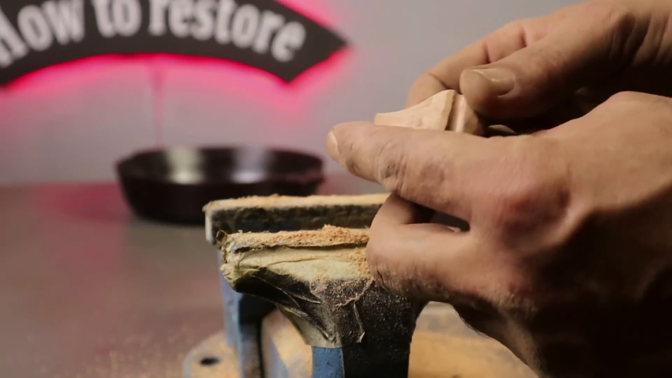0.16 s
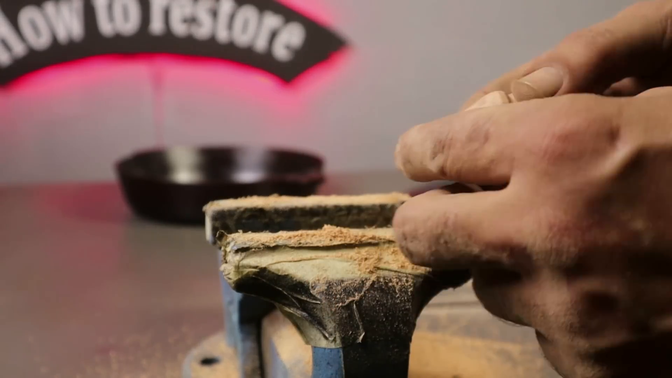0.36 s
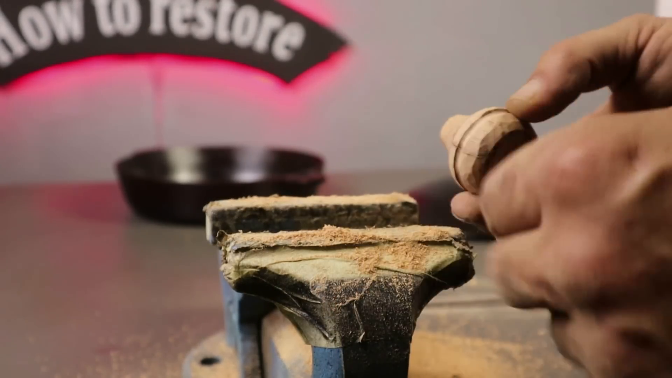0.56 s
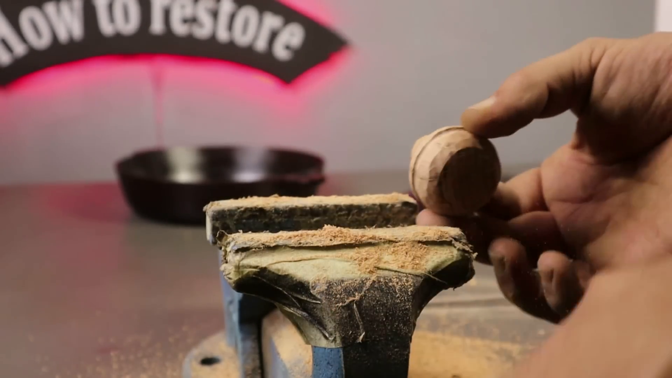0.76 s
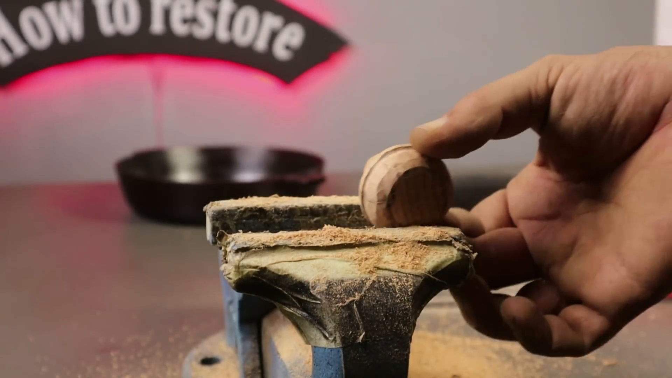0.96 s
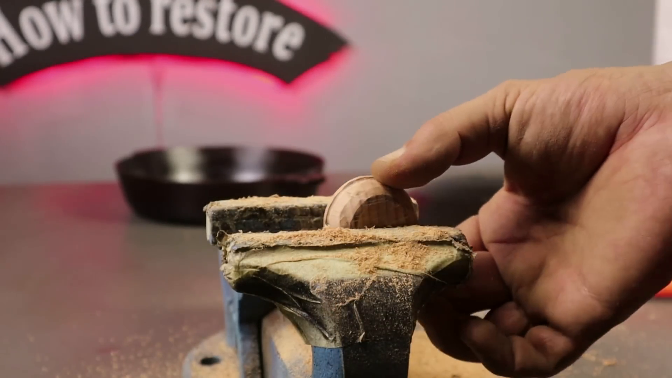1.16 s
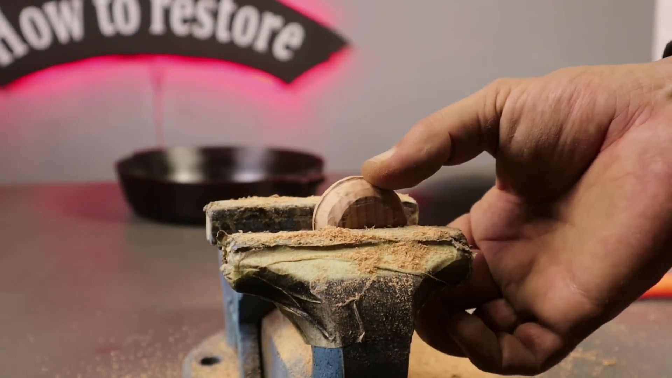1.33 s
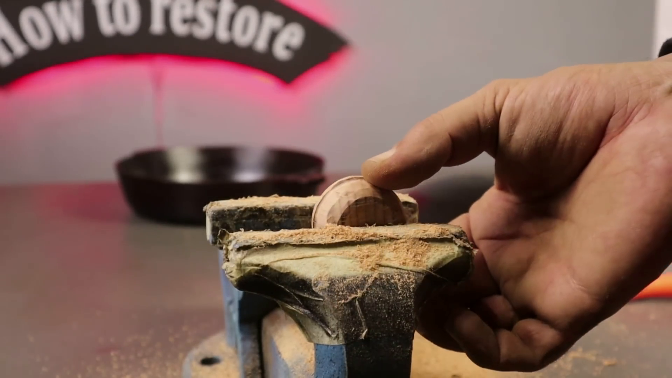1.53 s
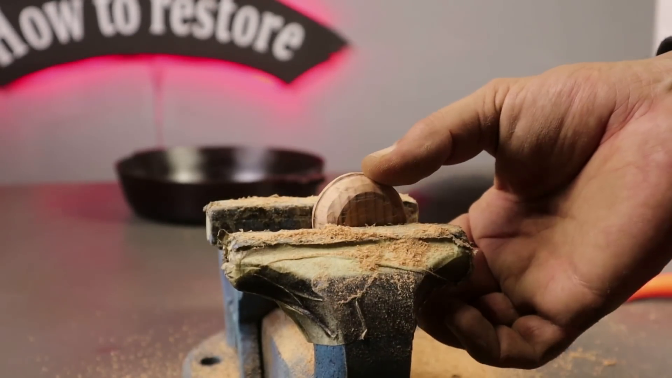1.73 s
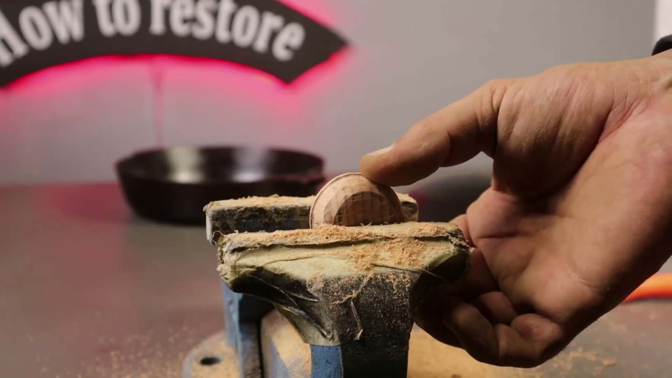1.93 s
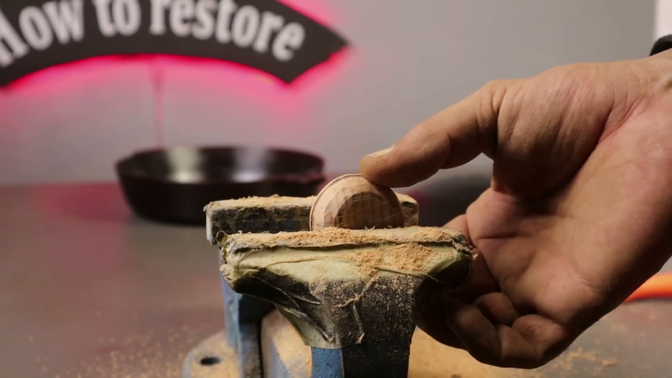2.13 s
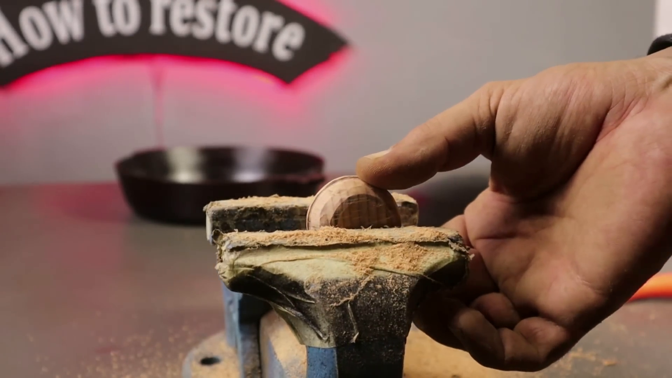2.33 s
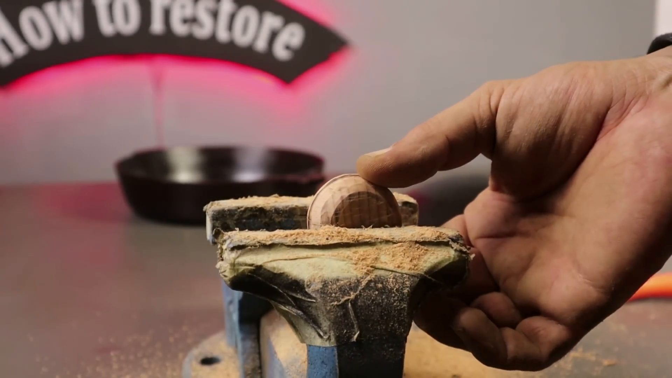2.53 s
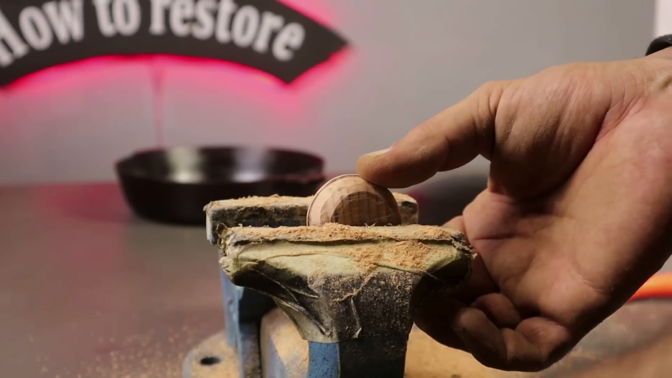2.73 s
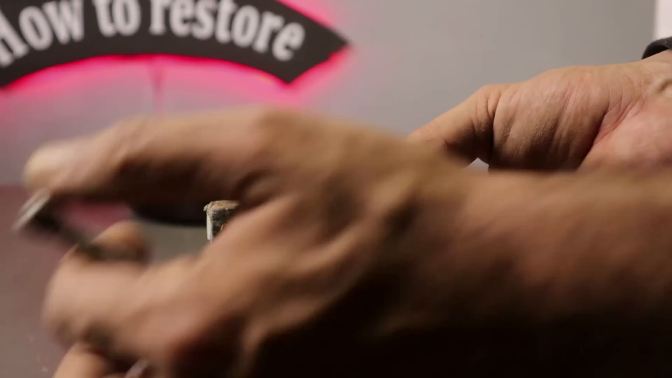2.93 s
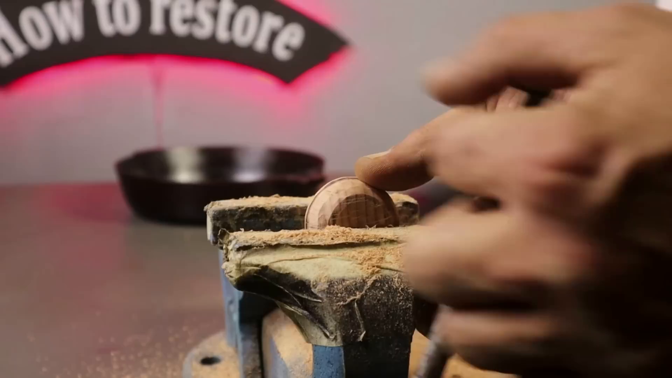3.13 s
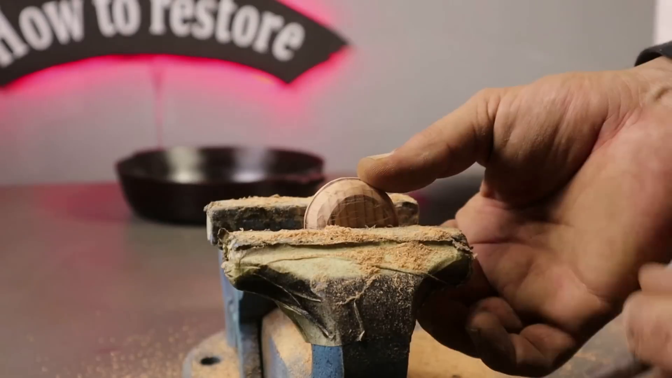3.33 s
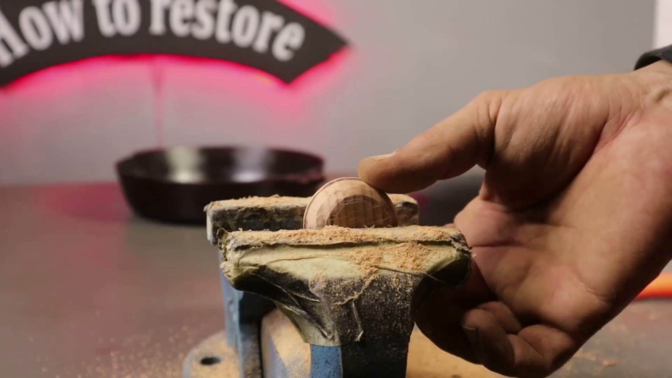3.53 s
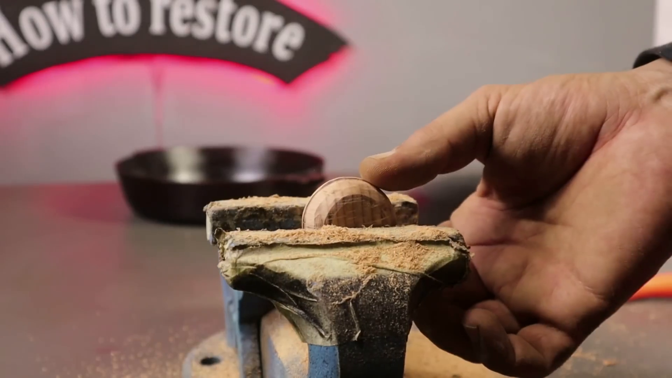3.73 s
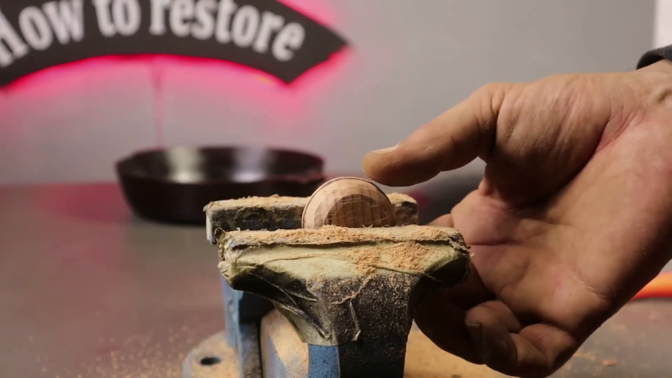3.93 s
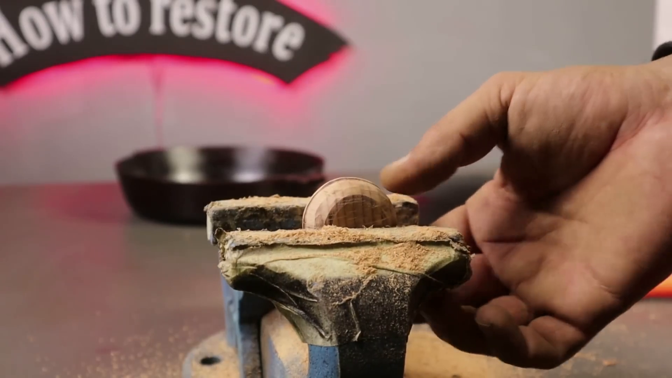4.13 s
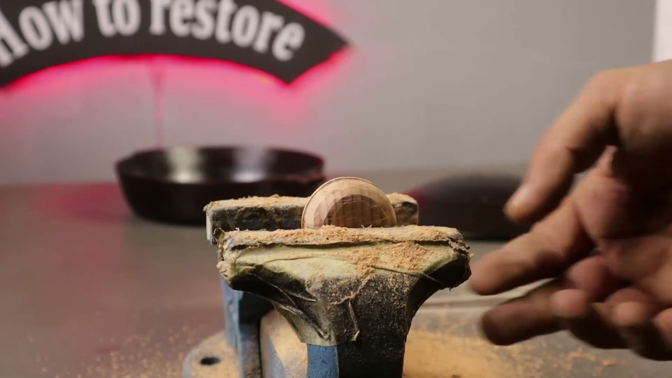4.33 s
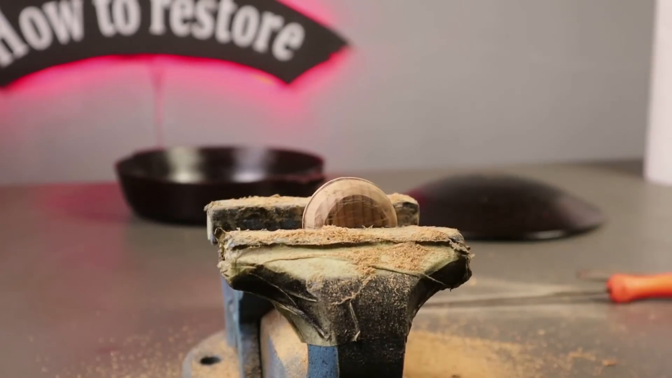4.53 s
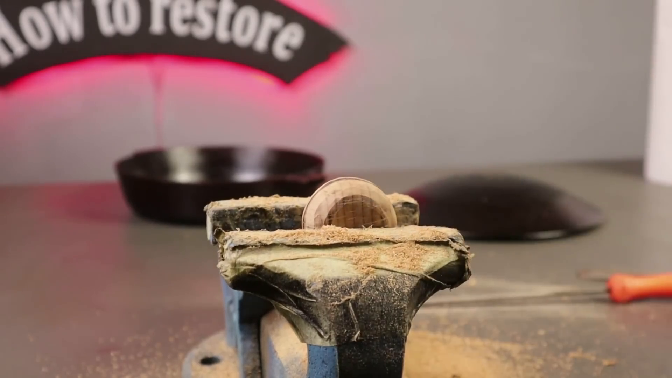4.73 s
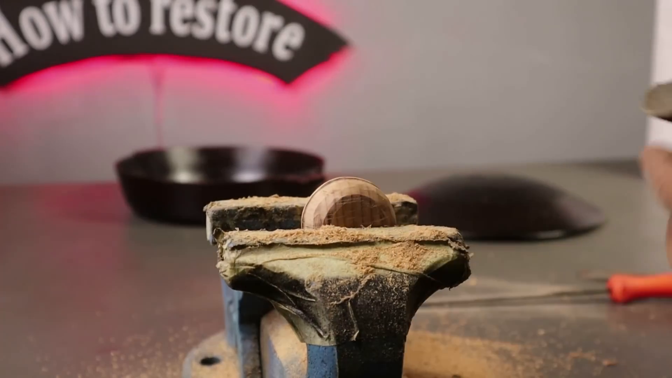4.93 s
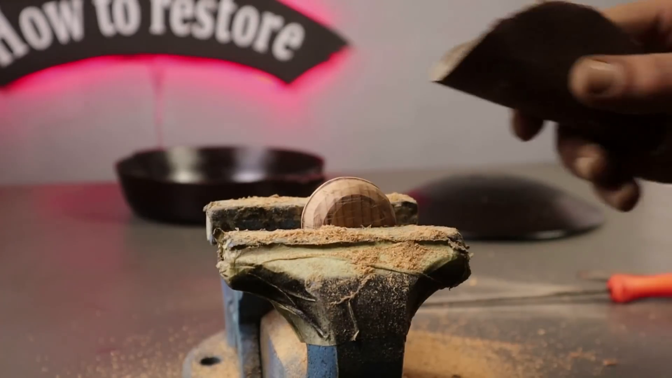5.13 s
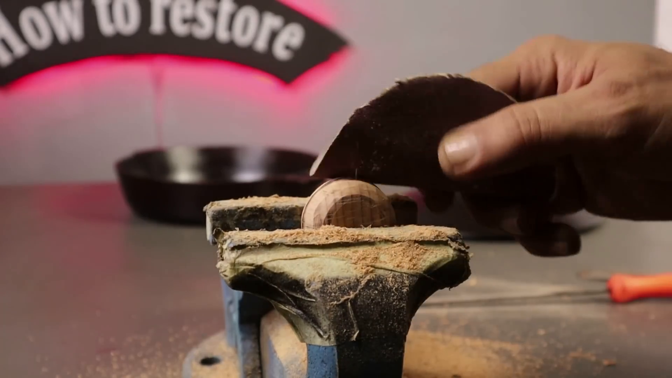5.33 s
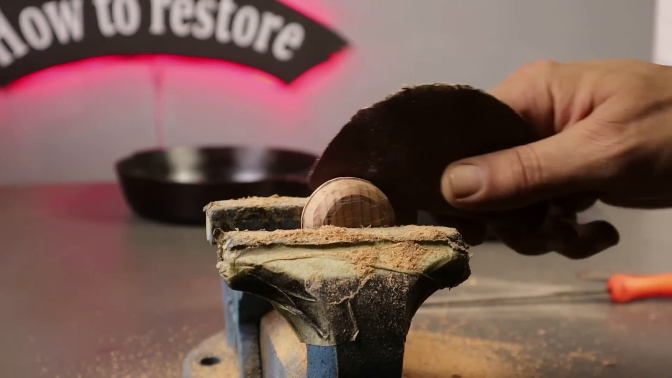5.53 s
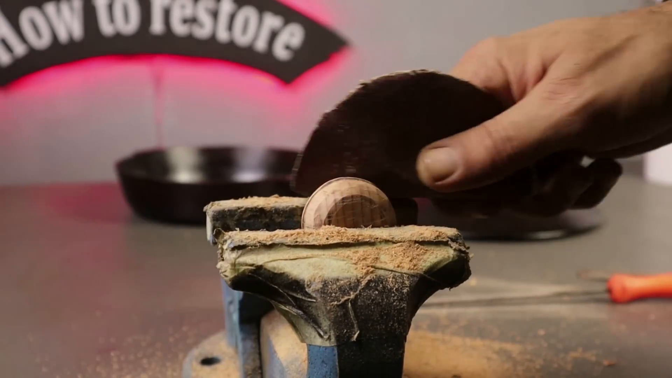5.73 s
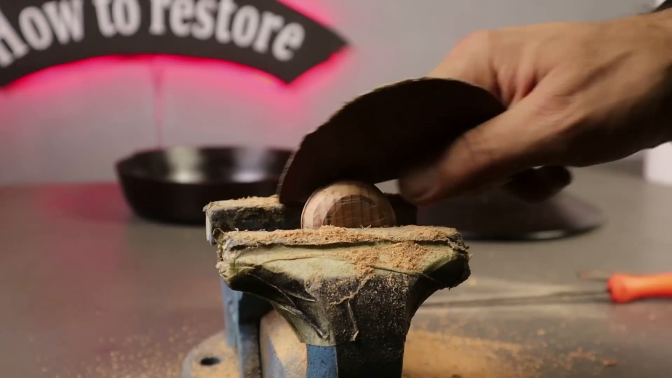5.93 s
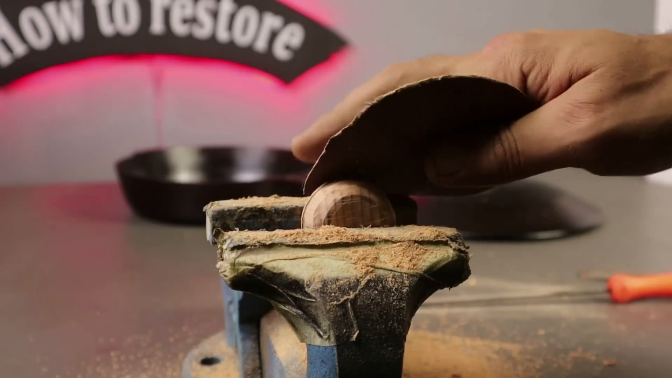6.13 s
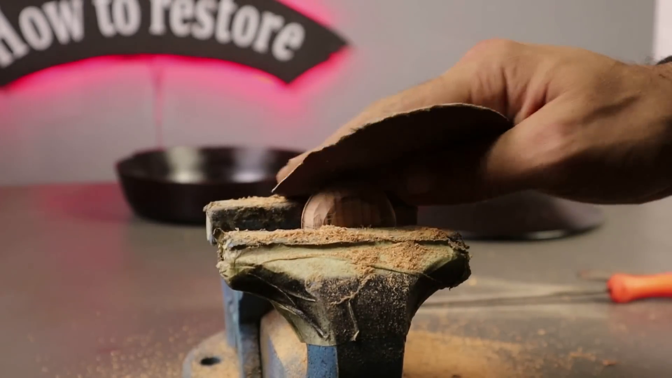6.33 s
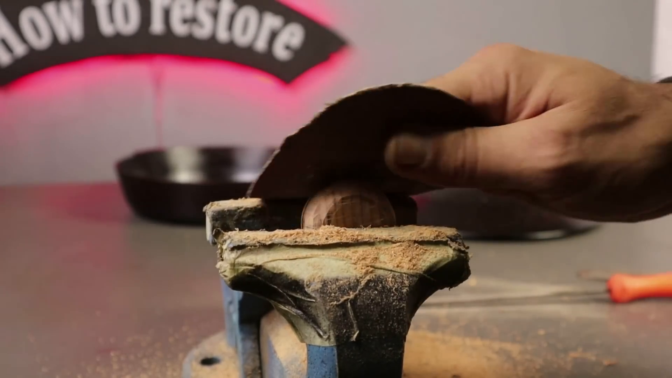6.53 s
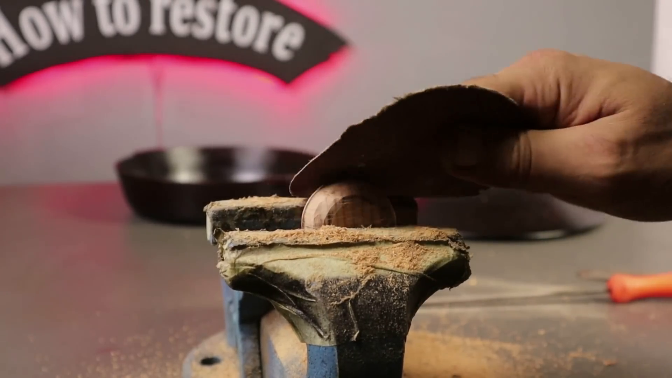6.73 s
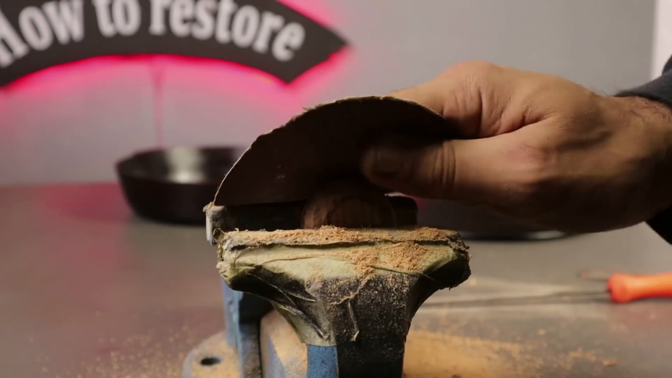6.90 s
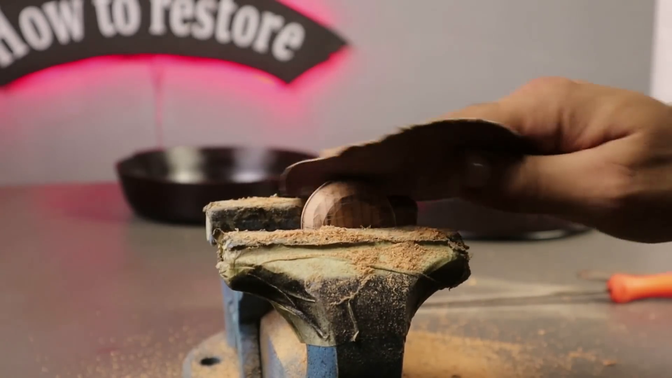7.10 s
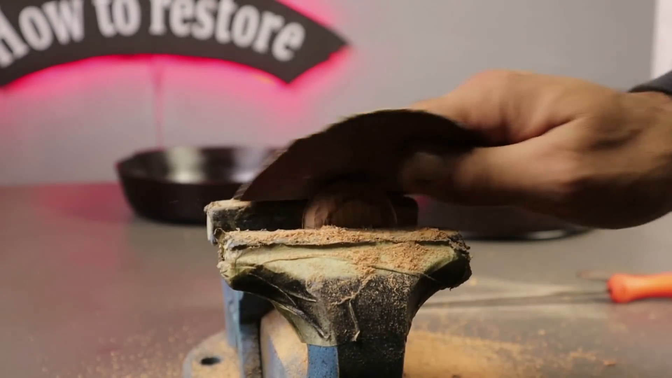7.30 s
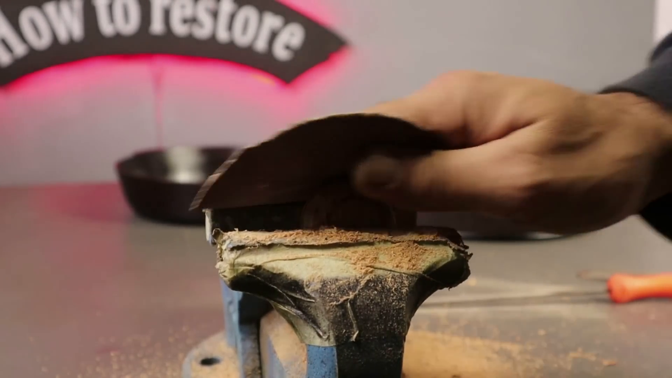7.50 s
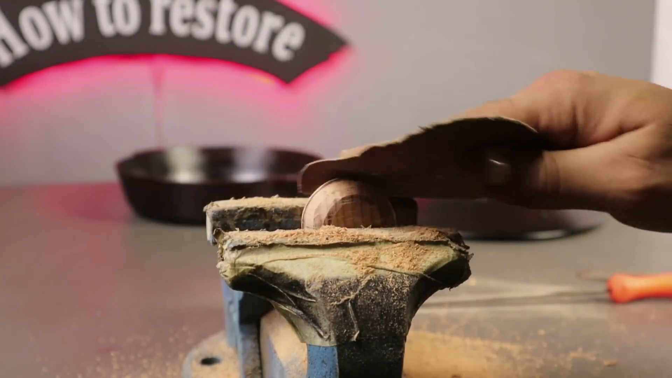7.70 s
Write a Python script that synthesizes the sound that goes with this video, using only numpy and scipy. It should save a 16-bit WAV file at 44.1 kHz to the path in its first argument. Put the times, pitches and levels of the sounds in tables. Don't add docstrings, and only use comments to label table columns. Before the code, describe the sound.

A close, central microphone hears a small workshop with low, uneven fan rumble and faint wide hiss throughout. A distant motor hum fades out by about 1 s. Around 0.6-1.0 s fingers brush wood softly, with tiny, very high squeaks. Faint vise taps begin at 1.2 s, with a light rattling cluster at 1.4-1.7 s. A loud metallic double knock lands at 2.07 s with a quick clink, then duller woody clunks at 2.65 and 2.91 s, each with a short bench thud and room echo. From 3 to 5.3 s it is mostly quiet, with slight rustles and weak thuds near 4 s. Stiff paper ticks on the wood at 5.4 s. Sanding follows: dry, gritty back-and-forth rasps roughly every 0.16 s, fuller around 5.6-6 s, dipping near 6.4 s, then harsher, brighter and louder from 6.6 s until the end near 7.9 s.

```python
import sys
import numpy as np
from scipy import signal
from scipy.fft import rfft, irfft, next_fast_len
from scipy.io import wavfile
from scipy.ndimage import uniform_filter1d, map_coordinates

SR = 44100
rng = np.random.default_rng(int(sys.argv[2]) if len(sys.argv) > 2 else 0)


def gain_from_decibels(decibels):
    exponent = np.asarray(decibels, float) / 20
    return 10 ** exponent


def master(y):
    cut = np.clip(np.atleast_2d(y).T, -1, 1)
    pcm = np.round(cut * 32767)
    wavfile.write(sys.argv[1], SR, pcm.astype(np.int16))


N = 346626
T = np.arange(N) / SR

# f/Hz, level/dB per Hz
SLACK_PAPER = [(760, -4), (1300, 2), (2130, 7.5), (3010, -14), (3720, -11), (4350, -12.5), (7590, -9),
               (9560, -11.5), (15200, -17.5), (16000, -3)]


def unit(x):
    return x / np.sqrt(np.mean(x ** 2) + 1e-20)


def along(points, hz):
    f, v = np.transpose(points)
    return np.interp(np.log(hz + 1), np.log(f + 1), v)


def wobble(rate):
    knots = rng.standard_normal(int(N * rate / SR) + 4)
    return map_coordinates(knots, [T * rate])


def filtered(x, response):
    m = next_fast_len(x.shape[-1] + 8192)
    spectrum = rfft(x, m) * response(np.fft.rfftfreq(m, 1 / SR))
    return irfft(spectrum, m)[..., :x.shape[-1]]


def resonances(modes, f):
    total = 0
    for k, (c, w, db) in enumerate(modes):
        sign = (-1) ** k
        total = total + sign * gain_from_decibels(db) * 1j * f * w / (c * c - f * f + 1j * f * w)
    return total


def patchy(patchy_db):
    z = signal.stft(rng.standard_normal(N), nperseg=512)[2]
    field = uniform_filter1d(rng.standard_normal(z.shape), size=6, axis=0)
    field = uniform_filter1d(field, size=6, axis=1)
    return signal.istft(z * gain_from_decibels(patchy_db * unit(field)), nperseg=512)[1][:N]


def widened(mid, side_db):
    scramble = rng.standard_normal(900)
    side = signal.fftconvolve(mid, scramble / np.linalg.norm(scramble))[:N]
    side = filtered(side, lambda hz: gain_from_decibels(along(side_db, hz)))
    return np.array([mid + side, mid - side])


def shop(x, wet_db):
    # f/Hz, time to fall 60 dB/s
    room_decay = [(150, 0.29), (500, 0.48), (1200, 0.44), (3000, 0.22), (8000, 0.29)]
    hz, t, z = signal.stft(rng.standard_normal(SR // 2), SR, nperseg=256)
    fade = gain_from_decibels(-60 * t / along(room_decay, hz)[:, None])
    tail = signal.istft(z * fade, SR, nperseg=256)[1]
    tail = np.pad(tail, (180, 0))
    return x + gain_from_decibels(wet_db) * signal.fftconvolve(x, tail / np.linalg.norm(tail))[:len(x)]


def air():
    # t/s, level/dB
    fan_effort = [(0, -58), (.65, -54.5), (1.2, -57), (2.3, -54.5), (3.3, -56.5), (3.9, -56), (5.3, -59),
                  (7.1, -58), (7.86, -53)]
    # t/s, level/dB
    motor_level = [(0, -52), (.5, -56.5), (.75, -54), (.95, -66), (1.1, -102)]
    # f/Hz, level/dB per Hz
    rumble_tone = [(12, -40), (27, -32), (45, -8.5), (62, -5.5), (141, -7), (295, -10.5), (338, -18),
                   (492, -24.5), (605, -28), (1200, -33), (1560, -31), (2640, -120)]
    # f/Hz, level/dB per Hz
    hiss_tone = [(350, 1.5), (600, -0.5), (748, -4), (1700, -6.5), (2340, -8), (15100, -11.5),
                 (16000, -15.5)]
    # f/Hz, side minus mid level/dB
    air_width = [(60, -28), (110, -37), (200, -23), (380, -13), (700, -10.5), (1290, -5.5), (2380, -0.5),
                 (4400, -0.5), (8120, 0), (15000, -1)]

    rumble_db = np.interp(T, *np.transpose(fan_effort)) + 1.7 * wobble(3.0) + 0.31
    rumble = gain_from_decibels(rumble_db) * unit(filtered(patchy(patchy_db=2.0), lambda hz: gain_from_decibels(along(rumble_tone, hz))))

    motor_hz = 140 + 5.5 * wobble(16)
    motor_db = np.interp(T, *np.transpose(motor_level)) + 2.5 * wobble(8)
    motor = gain_from_decibels(motor_db) * np.sin(2 * np.pi * np.cumsum(motor_hz) / SR)

    hiss = gain_from_decibels(-60) * unit(filtered(rng.standard_normal(N), lambda hz: gain_from_decibels(along(hiss_tone, hz))))
    return widened(rumble + motor + hiss, air_width)


def brushing():
    # start t/s, length/s, level/dB, centre f/Hz,
    # width/octaves
    brushes = [(0.625, 0.1, -61, 8500, 0.27), (0.73, 0.062, -57.5, 8000, 1.1),
               (0.831, 0.13, -60, 3000, 3.6), (3.321, 0.15, -58, 9900, 1.2), (3.898, 0.065, -63, 11000, .6),
               (4.19, 0.085, -62.5, 1020, 0.02), (4.892, 0.087, -56, 3720, 1.1),
               (4.887, 0.12, -60, 1640, 0.49), (5.102, 0.053, -52.5, 5270, 2),
               (5.105, 0.075, -60, 2170, 0.16), (5.19, 0.021, -60, 2020, 0.23),
               (5.209, 0.067, -58, 1810, 0.17), (5.348, 0.05, -55.5, 1920, 0.49)]
    out = np.zeros(N)
    for s, length, db, hz, octaves in brushes:
        swell = np.sin(np.pi * np.linspace(0, 1, round(length * SR))) ** 1.2
        band = lambda f: np.exp(-.5 * (np.log2((f + 1) / hz) / octaves) ** 2)
        rub = unit(filtered(rng.standard_normal(SR // 2), band))[:len(swell)]
        out[round(s * SR):][:len(swell)] += gain_from_decibels(db) * swell * rub
    return out


def squeaks():
    # start t/s, length/s, level/dB, top f/Hz, fastest at t/s
    slips = [
        (0.95, 0.049, -55, 14640, .887),
        (0.84, 0.094, -63, 10400, .89),
        (0.807, 0.049, -64, 10900, .885),
        (.885, .035, -62, 11000, .89),
        (0.83, 0.032, -70, 12000, .89),
        (.77, 0.057, -75, 10400, 0.6),
        (.785, 0.046, -75, 8400, 0.52),
        (.865, .04, -75, 12000, .88),
        (.86, .04, -76, 4500, .88),
    ]
    bow = 58
    out = np.zeros(N)
    for s, length, db, hz, fastest in slips:
        swell = np.sin(np.pi * np.clip((T - s) / length, 0, 1)) ** .6
        speed = np.clip(1 - bow * (T - fastest) ** 2, .5, 1)
        pitch = hz * (speed + .006 * wobble(250))
        tone = np.sin(2 * np.pi * np.cumsum(pitch) / SR)
        out += gain_from_decibels(db + 3 + 4 * wobble(120)) * swell * tone
    return out


def ringing(modes, t, spot_hz, reach):
    luck = rng.normal([0, 1], [2.5, .006], (len(modes), 2))
    total = 0
    for (hz, db, t60), (luck_db, detune) in zip(modes, luck):
        far_db = 10.0 * (np.log2(hz / spot_hz) / reach) ** 2
        level_db = db + luck_db - far_db - 60 * t / t60
        total = total + gain_from_decibels(level_db) * np.sin(2 * np.pi * hz * detune * t)
    return total


def rattle(t, hz, width_hz, t60):
    noise = filtered(rng.standard_normal(len(t)), lambda f: resonances([(hz, width_hz, 0)], f) ** 2)
    return unit(noise) * gain_from_decibels(-60 * t / t60)


def struck(x):
    return x / np.sqrt(np.mean(x[:1100] ** 2))


def vise():
    # t/s, peak level/dB, bench thud level/dB, steel edge level/dB, struck spot f/Hz
    knocks = [(1.171, -45, -11, -27, 1180), (1.19, -44.5, -25, -30, 786), (1.263, -59.5, -4, -12, 1160),
              (1.4, -46.5, -7.5, -3, 1150), (1.425, -37, -15, -6, 1580), (1.449, -33.5, -17, -3, 1440),
              (1.461, -35.5, -7, 4, 1580), (1.481, -42.5, -3, -17, 910), (1.497, -44, -8, -16, 804),
              (1.607, -41.5, -4, -38, 650), (1.639, -48.5, -6, -10.5, 600), (1.707, -48, -20, -18, 643),
              (2.069, -16, -12, 1, 1330), (2.078, -19.5, -22, -16, 1510), (2.129, -27, -33, -0.5, 860),
              (2.655, -24, -12, -21, 700), (2.674, -35, -8.5, -36, 1280), (2.911, -27.5, -10.5, -23, 700),
              (2.92, -33, -7, 7.5, 1050), (4.011, -45, -3.5, -22, 710), (4.026, -59.5, 11.5, -24, 500),
              (4.055, -65, 10.5, -30, 500), (4.188, -50.5, -9.5, -17, 1030)]
    # f/Hz, level/dB, time to fall 60 dB/s
    body_modes = [(660, -6, .05), (770, -5, .06), (1030, -6, .07), (1130, -6, .06), (1290, -5, .05),
                  (1470, -1, .06), (1640, -4, .05)]
    # f/Hz, level/dB, time to fall 60 dB/s
    bench_modes = [(63.6, -12, 0.14), (101.2, -9.5, 0.98), (190.7, 2, 0.14), (262, -7, 0.094),
                   (310.3, 5, 0.067), (421, 3, 0.14), (503, 11, 0.059)]
    # f/Hz, level/dB, time to fall 60 dB/s
    handle_modes = [(2335, 3, .1), (5660, 2, .1), (6350, -8, .06)]

    out, t = np.zeros(N + SR), np.arange(SR // 2) / SR
    blunt = signal.butter(3, [55, 7200], "bandpass", fs=SR, output="sos")
    for s, db, thud_db, edge_db, spot_hz in knocks:
        deep_hz = 420 * gain_from_decibels(0.32 * edge_db)
        body = gain_from_decibels(4.5) * ringing(body_modes, t, spot_hz, reach=0.22)
        body = body + rattle(t, spot_hz, width_hz=0.75 * spot_hz, t60=0.041)
        thud = gain_from_decibels(-8.5) * ringing(bench_modes, t, deep_hz, reach=2.7)
        thud = thud + rattle(t, deep_hz, width_hz=1.86 * deep_hz, t60=0.19)
        edge = gain_from_decibels(-9.5) * ringing(handle_modes, t, 3000, reach=3.4)
        edge = edge + rattle(t, hz=2660, width_hz=1900, t60=0.067)
        parts = struck(body) + gain_from_decibels(thud_db + 11.5) * struck(thud) + gain_from_decibels(edge_db - 7.5) * struck(edge)
        contact_s = min(0.00027 * gain_from_decibels(-.5 * edge_db), .002)
        blow = signal.sosfilt(blunt, parts * (1 - np.exp(-t / contact_s)))
        out[round((s - .0008) * SR):][:len(t)] += gain_from_decibels(db - 9.0) * shop(blow, wet_db=-5.5)
    return out[:N]


def paper_ticks():
    # t/s, peak level/dB, f/Hz
    ticks = [
        (5.3772, -31.5, 1800),
        (5.413, -27, 1228),
        (5.79, -42.5, 1730),
        (6.578, -40, 1820),
        (7.187, -35, 1800),
        (7.5026, -48, 2200),
    ]
    snap_from, snap_fall_s = 4.2, 0.00075
    out, t = np.zeros(N + 2000), np.arange(2000) / SR
    for s, db, hz in ticks:
        through_sheet = lambda f: gain_from_decibels(along(SLACK_PAPER, f)) * f / (f + 900)
        crackle = unit(filtered(rng.standard_normal(len(t)), through_sheet))
        bent_t = t + snap_from * snap_fall_s * (1 - np.exp(-t / snap_fall_s))
        tone = np.sin(2 * np.pi * hz * bent_t)
        envelope = np.exp(-(t / 0.0042) ** 4) * (1 - np.exp(-t / 0.000091))
        snap = (0.89 * tone + 0.79 * crackle) * envelope
        out[round(s * SR):][:len(t)] += gain_from_decibels(db - 5.0) * snap
    return shop(out[:N], wet_db=-5.0)


def sanding():
    # hand turns t/s, speeding up/s, full speed/s, level/dB, dull/0-1 (1 slack and low, 0 taut and hissing)
    strokes = [(5.408, 0.0063, 0.14, -49.5, 0.72), (5.554, 0.084, 0.095, -38, 0.71),
               (5.782, 0.021, 0.076, -35, 0.69), (5.941, 0.012, 0.13, -39, 0.73),
               (6.106, 0.012, 0.087, -43, 0.58), (6.24, 0.032, 0.091, -44.5, 0.73),
               (6.404, 0.031, 0.084, -50.5, 0.57), (6.57, 0.015, 0.082, -37.5, 0.73),
               (6.689, 0.05, 0.069, -37, 0.42), (6.848, 0.05, 0.074, -32, 0.55),
               (7.006, 0.048, 0.068, -33.5, 0.47), (7.17, 0.046, 0.08, -29.5, .43),
               (7.328, 0.041, 0.09, -33, 0.37), (7.49, 0.054, 0.081, -28, 0.45),
               (7.66, 0.04, 0.091, -30, 0.32), (7.832, 0.058, .07, -26.5, 0.72)]
    # f/Hz, level/dB per Hz
    taut_paper = [(760, -50), (1300, -21), (2150, -10), (3040, -3), (3840, 0.5), (4580, -4), (5260, -1),
                  (6420, -10), (8340, -12), (16000, -14.5)]
    # f/Hz, width/Hz, level/dB
    sheet_modes = [(2310, 200, -1), (2650, 180, 7), (3400, 400, 4.5), (5050, 650, -1), (8000, 2700, -1.5)]
    # f/Hz, width/Hz, level/dB
    knob_modes = [(360, 290, -20.5), (650, 14, -4.5), (726, 980, -17.5), (830, 37, -9.5), (1153, 54, 1)]
    # t/s, treble from its face turned to the microphone/dB, weight on the knob/dB
    disc_hold = [(5.4, 4, -0.5), (5.62, 0, -1.5), (5.9, 0.5, -1.5), (6.05, 0, 0), (6.45, 6, 3),
                 (6.6, -3.5, -5), (6.8, -4.5, 2), (7.1, 1.5, -0.5), (7.3, 0.5, -1.5), (7.79, -2.5, 1.5),
                 (7.83, -7, -3)]
    turn_db, full_stop_s = 27.5, 0.12
    landing_db = -56

    turn, rise, hold, level_db, dull = np.transpose(strokes)
    start, middle, stop = turn + rise, turn + rise + hold / 2, turn + rise + hold
    pause = np.clip((start[1:] - stop[:-1]) / full_stop_s, 0, 1)
    rest_db = np.r_[landing_db, (level_db[1:] + level_db[:-1]) / 2 - turn_db * pause]
    times = np.ravel([turn, start, middle, stop], order="F")
    pace_db = np.ravel([rest_db, level_db + 3.5, level_db + 6.5, level_db - 1.0], order="F")
    pace = np.interp(T, times, gain_from_decibels(.65 * pace_db), left=0) ** (1 / .65)
    pace = uniform_filter1d(pace, size=300)
    slack = np.clip(np.interp(T, middle, dull), 0, 1)

    caught = rng.random(N) < .08
    grain_db = 3 * np.minimum(rng.exponential(size=N), 4)
    grains = caught * gain_from_decibels(grain_db) * rng.standard_normal(N)
    grit = unit(patchy(patchy_db=2.4) + .6 * unit(grains))
    grit = grit * gain_from_decibels(.9 * wobble(35) + 1.1 * wobble(120))

    def bend(hz):
        return (1 + .5 * abs(resonances(sheet_modes, hz))) * hz ** 2 / (hz ** 2 + 450 ** 2)

    loose = unit(filtered(grit, lambda hz: gain_from_decibels(along(SLACK_PAPER, hz)) * bend(hz)))
    tight = unit(filtered(grit, lambda hz: gain_from_decibels(along(taut_paper, hz)) * bend(hz)))
    sheet = gain_from_decibels(-2.0) * pace * (slack * loose + (1 - slack) * tight)
    top = filtered(sheet, lambda hz: 1 / (1 + (8500 / (hz + 1)) ** 8))
    s, facing_db, weight_db = np.transpose(disc_hold)
    sheet = sheet + (gain_from_decibels(np.interp(T, s, facing_db)) - 1) * top

    grip = pace / np.sqrt(1 + (pace / gain_from_decibels(-37)) ** 2)
    grip = grip * pace / (pace + gain_from_decibels(-45))
    drive = grip * gain_from_decibels(np.interp(T, s, weight_db) + 2.53 * wobble(25)) * patchy(patchy_db=3.0)

    def knob_response(hz):
        return np.sqrt(sum(abs(resonances([mode], hz)) ** 2 for mode in knob_modes))

    knob = gain_from_decibels(17.5) * filtered(drive, knob_response)
    return shop(sheet + knob, wet_db=-10.0)


def scene():
    # f/Hz, level/dB
    capsule = [(6500, 0.5), (8300, 4), (9300, -0.5), (10600, -4.5), (11600, -3.5), (12800, 1), (15000, -5)]
    # f/Hz, side minus mid level/dB
    near_width = [(60, -54), (110, -62), (200, -73), (380, -92), (700, -106), (1290, -78), (2380, -34.5),
                  (4400, -24), (8120, -26.5), (15000, -69)]
    work = brushing() + squeaks() + vise() + paper_ticks() + sanding()
    work = filtered(work, lambda hz: gain_from_decibels(along(capsule, hz)))
    return air() + widened(work, near_width)


def band_limit(x):
    return signal.sosfilt(signal.butter(12, 16520, fs=SR, output="sos"), x)


def record(dry):
    top_hz = 15760
    mix = filtered(dry, lambda hz: hz < top_hz)
    return band_limit(mix)


dry = scene()
out = record(dry)
master(out)
```